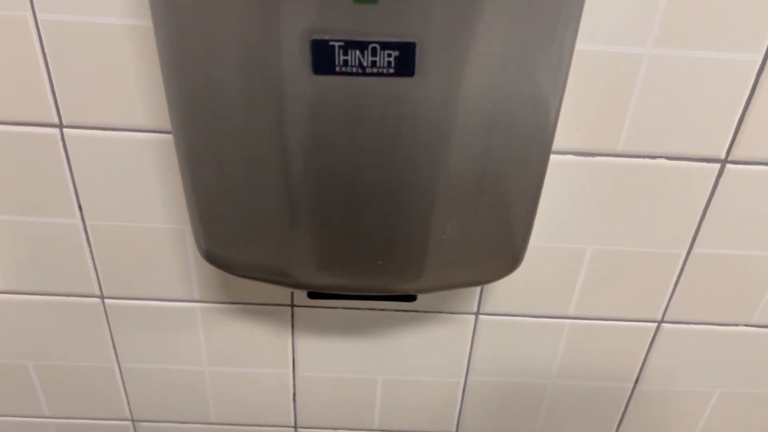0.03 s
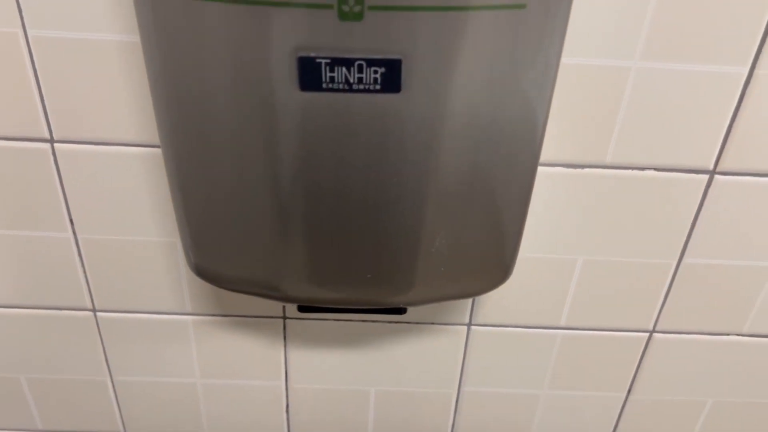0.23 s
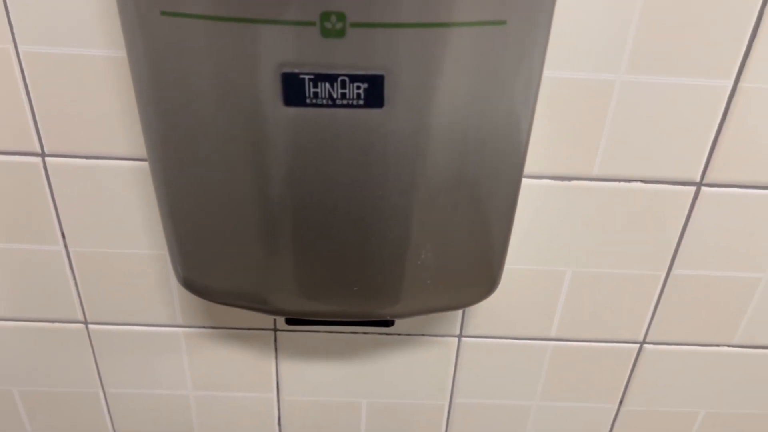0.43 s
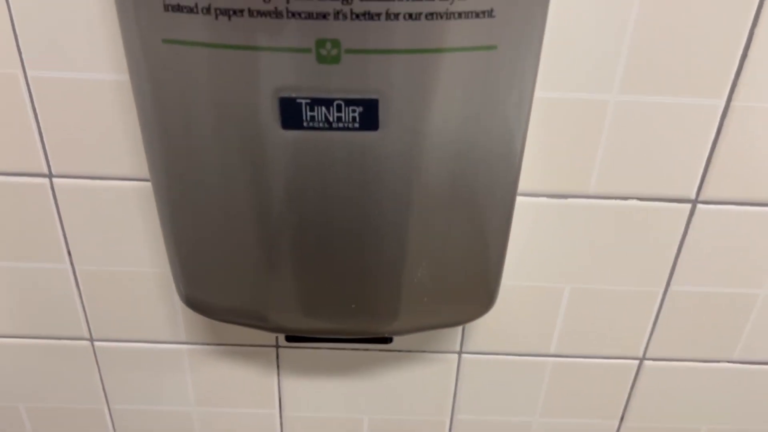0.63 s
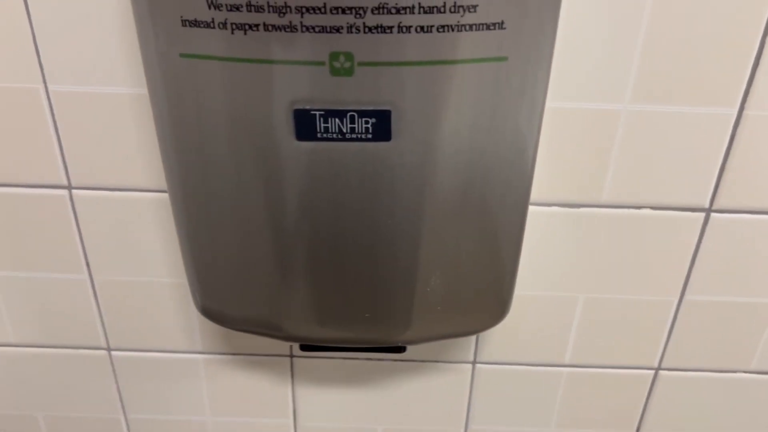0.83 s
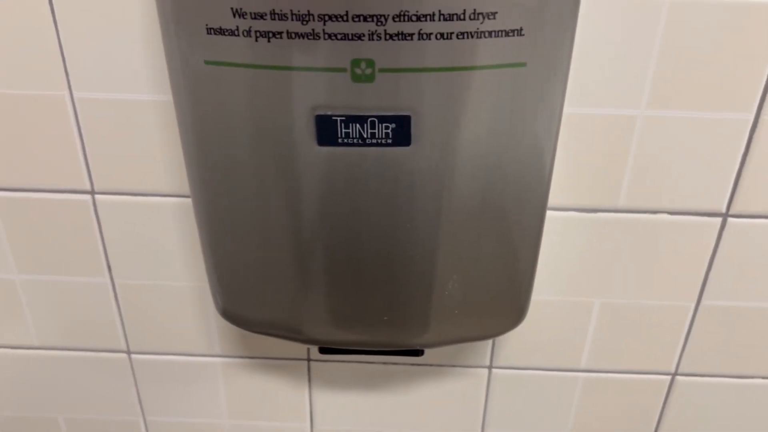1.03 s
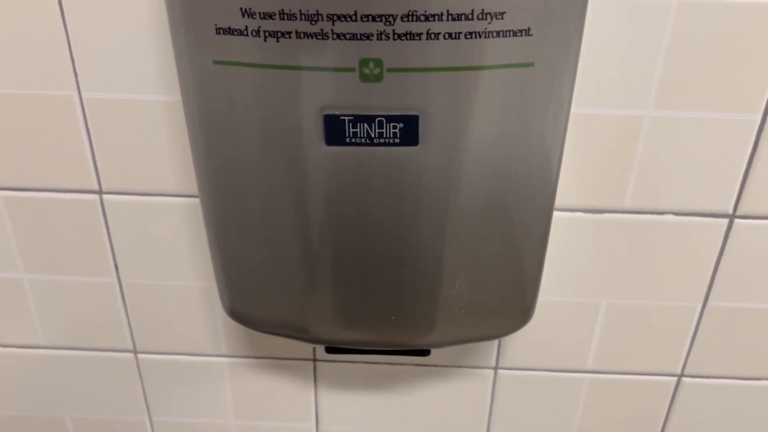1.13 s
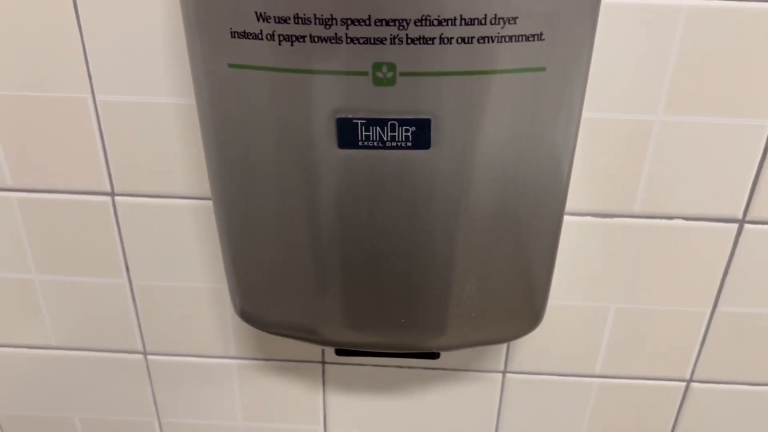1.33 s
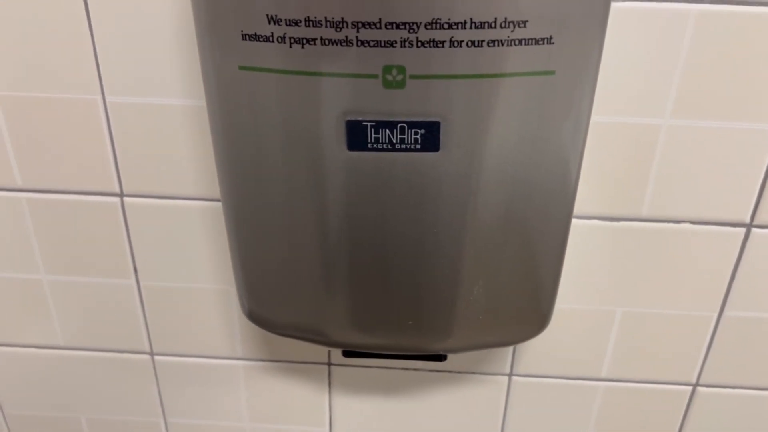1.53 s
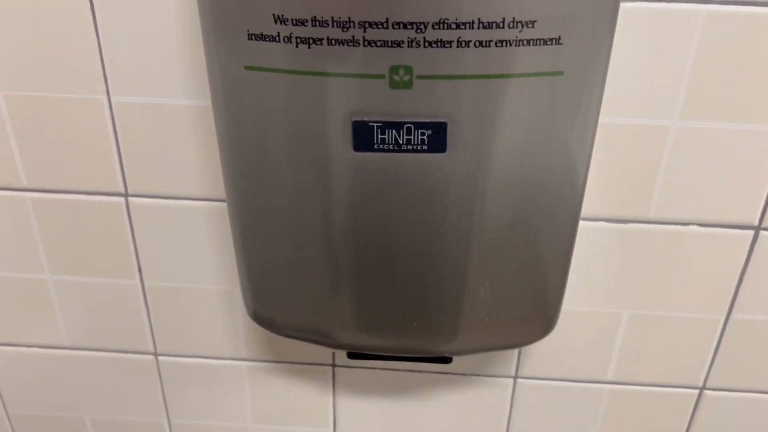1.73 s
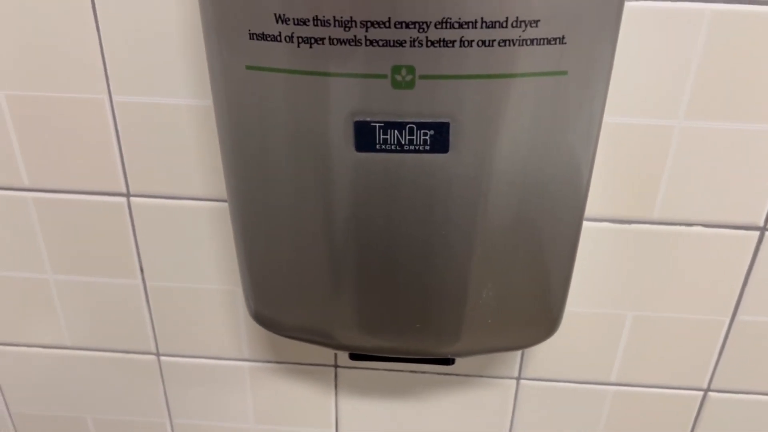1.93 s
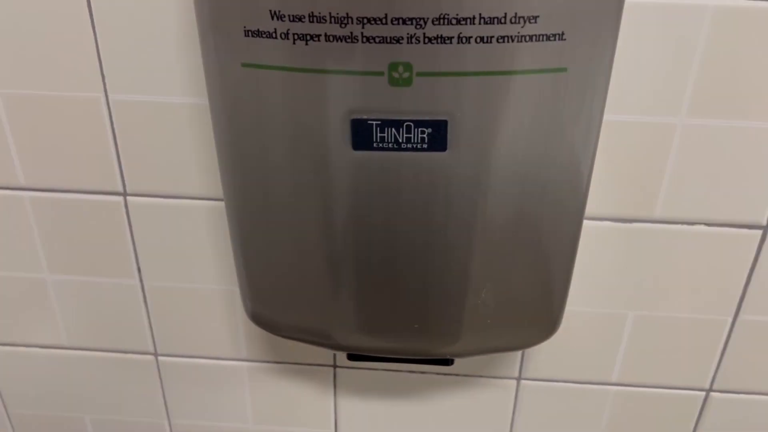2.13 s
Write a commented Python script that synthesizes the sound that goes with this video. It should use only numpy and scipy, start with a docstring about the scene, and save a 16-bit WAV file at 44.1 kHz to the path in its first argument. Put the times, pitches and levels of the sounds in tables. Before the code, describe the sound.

Hand dryer motor coasting to a stop, its hum dropping in pitch as the air dies.

```python
"""A tiled restroom, close to a wall-mounted hand dryer that is coasting to a stop.
The unbalanced shaft hums down in pitch, and its overtones sweep through the housing's resonances.
The fan's whistle and the rush of air die first, leaving the rumble of the bearings and the thin
hiss of the carbon brushes over quiet room tone and the boom of a low room resonance."""
import sys
import numpy as np
from scipy import signal
from scipy.fft import rfft, irfft
from scipy.io import wavfile
from scipy.ndimage import uniform_filter1d

SR = 44100
rng = np.random.default_rng(int(sys.argv[2]) if len(sys.argv) > 2 else 0)


def waveform_to_disk(signal):
    """Save audio, clipped to [-1, 1], as 16-bit WAV at the path in sys.argv[1]."""
    frames = np.transpose(np.atleast_2d(signal))
    scaled = np.clip(frames, -1, 1) * 32767
    samples = np.round(scaled).astype(np.int16)
    wavfile.write(sys.argv[1], SR, samples)


N = 96402
TIME = np.arange(N) / SR
FREQS = np.maximum(np.arange(N // 2 + 1) * SR / N, 1)
LEFT_RIGHT = np.array([[1], [-1]])

# Stereo balance of the room. Each row: frequency in Hz, left minus right in dB.
ROOM_LEAN = [(100, 0.9), (200, 0.5), (400, 2.3), (700, 1.8), (1300, 4), (2400, 6), (4400, 7.5), (6200, 10),
             (8100, 4.8), (10000, 0)]


def undb(db):
    """Amplitude ratio of a level in decibels."""
    return 10 ** (np.asarray(db) / 20)


def unit(x):
    """Normalisation to an rms of 1."""
    return x / np.sqrt(np.mean(x ** 2))


def curve(rows):
    """Linear interpolation in time."""
    return np.interp(TIME, *np.transpose(rows))


def shape(rows):
    """Interpolation on a log-frequency axis."""
    hz, values = np.transpose(rows)
    return np.interp(np.log(FREQS), np.log(hz), values)


def walk(rate):
    """Smooth random fluctuation of unit rms, with `rate` new values a second."""
    hold = max(int(SR / rate), 1)
    steps = np.repeat(rng.standard_normal(N // hold + 1), hold)
    return unit(uniform_filter1d(steps, hold)[:N])


def tone(hz, jitter, rate):
    """Random frequency modulation makes a sine tremble in pitch."""
    return np.sin(2 * np.pi * np.cumsum(hz * (1 + jitter * walk(rate))) / SR)


def resonances(modes):
    """Frequency response of steep-sided resonances that add in power."""
    power = 0
    for hz, width, db in modes:
        detuning = (FREQS ** 2 - hz ** 2) / (FREQS * width)
        power += undb(db) ** 2 / (1 + detuning ** 2) ** 1.47
    return np.sqrt(power)


def ring(x, modes):
    """Damped modes, driven by a passing tone, ring on in free decay."""
    response = 0
    for hz, t60, db in modes:
        decay = np.log(1000) / t60
        response += undb(db) * 2 * decay / SR * np.exp(-decay * TIME) * np.cos(2 * np.pi * hz * TIME)
    return signal.fftconvolve(x, response[None], axes=1)[:, :N]


def ripple(spacing_hz=22.09, depth_db=2.5):
    """Interference of hard-wall reflections leaves fine spectral peaks and dips, weak in the bass."""
    peaks = np.interp(FREQS, np.arange(2000) * spacing_hz, rng.standard_normal(2000))
    return undb(depth_db * np.minimum(FREQS / 1200, 1) * peaks)


def noise(gain, lean, direct_hz=3540, lag_s=0.0001606):
    """Partly coherent stereo noise: alike in the bass, diffuse in the middle, more direct on top."""
    # Each row: frequency in Hz, coherence of the two sides from 0 to 1.
    likeness = [(100, 0.82), (250, 0.78), (500, 0.57), (1200, 0.025), (3500, 0.013), (6500, 0.28),
                (9000, 0.3), (15000, 0.27)]
    coherence = shape(likeness)
    mid, side = rfft(rng.standard_normal((2, N)))
    pair = mid * np.sqrt(1 + coherence) + LEFT_RIGHT * side * np.sqrt(1 - coherence)
    pair[0] *= np.exp(-2j * np.pi * FREQS * (FREQS > direct_hz) * lag_s)  # treble reaches the left later
    balance = undb(LEFT_RIGHT * shape(lean) / 2)
    balance /= np.sqrt(np.mean(balance ** 2, axis=0))
    return unit(irfft(pair * gain * balance * ripple(), N))


def tiles(x, wet_db, lean_db, t60_s=0.86, build_s=0.033):
    """Reverberation: the tiles add a diffuse, exponentially decaying field to the direct sound."""
    x = x * np.minimum(TIME / .012, 1)
    tail = noise(1, ROOM_LEAN) * undb(-60 * TIME / t60_s)
    tail *= 1 - np.exp(-TIME / build_s)
    tail /= np.sqrt(np.sum(tail ** 2) / 2)
    wet = signal.fftconvolve(x[None], tail, axes=1)[:, :N]
    direct = x * undb(LEFT_RIGHT * lean_db / 2)
    return (direct + undb(wet_db) * wet) / np.hypot(1, undb(wet_db))


def restroom():
    """Quiet room tone, and a low room resonance that booms as the slowing shaft passes its pitch."""
    # Each row: frequency in Hz, relative level in dB.
    room_spectrum = [(25, -15), (70, -2), (150, -1.5), (300, -11), (500, -14.5), (800, -21.5), (1500, -27),
                     (5000, -61)]
    # Each row: time in seconds, level in dB.
    boom_level = [(0, -87), (.6, -70), (1.25, -71), (1.42, -66), (1.55, -76), (1.66, -78), (1.72, -64),
                  (1.89, -62), (1.96, -76), (2.19, -84)]
    room_tone = undb(-68) * noise(undb(shape(room_spectrum)), ROOM_LEAN)
    boom = tone(hz=71.6, jitter=0.009, rate=11) * undb(curve(boom_level))
    return room_tone + boom


def brushes(angle, throb_depth=0.059):
    """Sliding friction of carbon brushes on the commutator excites narrow high resonances."""
    # Each row: frequency in Hz, width in Hz, relative level in dB.
    brush_modes = [(2627, 30, -2), (3340, 92, 0), (3600, 270, -21), (3804, 53, -2), (5310, 61, -2),
                   (6420, 54, 1), (6647, 130, 3.5), (7020, 62, 4.5), (7290, 440, -5), (7780, 28, 2),
                   (8120, 71, 1), (11140, 300, -13.5), (15230, 1600, -21)]
    # Broad hiss under the resonances. Each row: frequency in Hz, relative level in dB.
    hiss_spectrum = [(1000, -37), (2500, 4.5), (2950, -12), (3500, 4.5), (5500, -11), (7500, 9.5),
                     (8300, 3), (8700, -5), (13000, -30.5), (15800, 1)]
    # Each row: frequency in Hz, left minus right in dB.
    brush_lean = [(2500, 7), (5500, 2.5), (7000, 3), (9000, -1)]
    # Each row: time in seconds, gain in dB.
    brush_level = [(0, -50.5), (.6, -64), (1.2, -65.5), (1.45, -66.5), (1.8, -64), (2.0, -68.5),
                   (2.19, -69.5)]
    ringing = noise(resonances(brush_modes), brush_lean)
    hiss = undb(0.5) * noise(undb(shape(hiss_spectrum)), brush_lean)
    return (ringing + hiss) * undb(curve(brush_level)) * (1 + throb_depth * np.cos(angle))


def bearings(angle, throb_depth=0.078):
    """Rolling noise, amplitude-modulated once a turn, excites the modes of housing and duct."""
    # Each row: frequency in Hz, width in Hz, relative level in dB.
    housing_modes = [(147.2, 16.4, -6), (187.5, 25, -8.5), (250, 29, -9), (349, 72, -11.5),
                     (439.4, 34.3, -5.5), (506, 21.7, 0), (576, 87, -11.5), (642.8, 18, -7.5),
                     (796.4, 8.3, -9.5)]
    duct_modes = [(910, 90, -11), (1100, 200, -8), (1340, 160, -.5), (1655, 110, 0), (1598, 42, 5),
                  (1930, 60, -9), (2170, 170, -3), (2490, 75, -1), (2610, 100, -3.5)]
    # Each row: time in seconds, level in dB.
    rumble_level = [(0, -47.5), (.5, -49.5), (1.0, -52), (1.4, -55), (1.75, -62), (1.95, -72), (2.19, -83)]
    duct_level = [(0, -43.5), (.5, -47.5), (.9, -52), (1.3, -60), (1.6, -69.5), (1.9, -81.5), (2.19, -106)]
    rumble = noise(resonances(housing_modes), ROOM_LEAN) * undb(curve(rumble_level))
    duct = noise(resonances(duct_modes), ROOM_LEAN) * undb(curve(duct_level))
    return (rumble + duct) * (1 + throb_depth * np.cos(angle))


def airflow():
    """Broadband flow noise: air rushes through the duct and hisses from the nozzle."""
    # Each row: frequency in Hz, relative spectral density in dB.
    rush_spectrum = [(25, -44), (60, -45), (140, -15.5), (280, -7.5), (400, -2.5), (500, -1), (620, -6.5),
                     (800, -7.5), (1100, -4.5), (1600, -2), (2000, -1.5), (2680, -1), (2950, -17.5),
                     (3400, -14), (4500, -14.5), (9000, -41)]
    jet_spectrum = [(100, -38), (700, -36), (1500, -18), (3000, 3), (3900, -3.5), (5000, 0), (6300, 2.5),
                    (8000, -8), (9000, -4), (10300, -16), (11300, -9), (12300, -20), (15800, -26)]
    # Each row: time in seconds, level in dB.
    rush_level = [(0, -37.5), (.17, -40.5), (.45, -44.5), (.75, -56), (1.1, -65), (1.5, -69), (1.9, -80.5),
                  (2.19, -82.5)]
    jet_level = [(0, -40), (.1, -44.5), (.2, -49), (.45, -56.5), (.75, -62.5), (1.2, -68.5), (2.19, -80.5)]
    rush = noise(undb(shape(rush_spectrum)), ROOM_LEAN) * undb(curve(rush_level))
    jet = noise(undb(shape(jet_spectrum)), ROOM_LEAN) * undb(curve(jet_level))
    return rush + jet


def fan(shaft_hz, blades=7, jitter=.009, roughness=.55, octave_fade_db_per_s=55):
    """A rough whistle at the blade-passing frequency and its octave, filtered by the fan's casing."""
    # Each row: time in seconds, level ahead of the casing in dB.
    whistle_level = [(0, -56), (.06, -43), (.1, -39), (.16, -40.5), (.21, -41), (.25, -45), (.3, -55),
                     (.6, -63), (1.2, -72), (2.19, -104)]
    # Each row: frequency in Hz, width in Hz, gain in dB.
    casing_modes = [(2690, 180, 0), (2865, 210, -6), (3210, 200, 0), (6270, 150, 6), (1450, 1500, 3.5)]
    phase = 2 * np.pi * blades * np.cumsum(shaft_hz * (1 + jitter * walk(200))) / SR
    octave = undb(-octave_fade_db_per_s * TIME) * np.sin(2 * phase)
    flutter = 1 + roughness * walk(260)
    whistle = (np.sin(phase) + octave) * flutter * undb(curve(whistle_level))
    whistle = tiles(whistle, wet_db=1, lean_db=12)
    return irfft(rfft(whistle) * resonances(casing_modes), N)


def shaft_overtones(shaft_hz, muffle_hz=590):
    """Forced vibration: the hum's falling overtones swell as they cross the housing's resonances."""
    # Each row: multiple of the shaft speed, relative level in dB.
    overtones = [(1.95, -7.5), (2.9, -1.5), (3.87, 2), (4.82, -5), (5.8, -16), (6.4, -6), (7.2, -12.5)]
    # Each row: time in seconds, gain in dB.
    drive_level = [(0, -63), (.5, -57), (.8, -48), (1.02, -49), (1.17, -61), (1.31, -53.5), (1.52, -52.5),
                   (1.7, -53.5), (1.85, -62.5), (2.19, -89)]
    # Each row: frequency in Hz, 60 dB decay time in seconds, gain in dB.
    panel_modes = [(142.25, 0.23, 4), (344.3, 0.088, -5.5), (486, 0.097, 2), (582.2, 0.16, -7),
                   (645, 0.29, -8.5)]
    partials = sum(undb(db + walk(20)) * tone(multiple * shaft_hz, jitter=.005, rate=90)
                   for multiple, db in overtones)
    muffled = signal.sosfilt(signal.butter(6, muffle_hz, fs=SR, output="sos"), partials)
    drive = tiles(muffled * undb(curve(drive_level)), wet_db=-7.5, lean_db=4.5)
    return ring(drive, panel_modes)


def shaft(angle):
    """Rotor unbalance hums at the rotation frequency and excites the room's standing waves in passing."""
    # The hum swells and dips as its pitch slides. Each row: time in seconds, level in dB.
    hum_level = [(0, -46), (.09, -44), (.14, -45), (.165, -55), (.21, -57), (.255, -47), (.29, -58),
                 (.35, -54), (.38, -47), (.43, -58), (.46, -55), (.485, -41.5), (.52, -46), (.55, -56),
                 (.59, -44), (.635, -40), (.67, -55), (.705, -52), (.727, -41), (.765, -62), (.825, -48),
                 (.855, -62), (.93, -49), (.96, -54), (1.04, -53), (1.08, -64), (1.11, -49.5), (1.16, -57),
                 (1.25, -51.5), (1.3, -64), (1.35, -59), (1.49, -69), (1.6, -76), (2.19, -100)]
    # Each row: time in seconds, left minus right in dB.
    hum_lean = [(0, 7), (.1, 6), (.17, -7), (.45, 5), (.6, -5.5), (.72, -5.5), (.85, 3), (1.5, -4.5)]
    # Each row: frequency in Hz, 60 dB decay time in seconds, gain in dB.
    room_modes = [(434, 1.2, 1), (335, .8, -7), (286, .7, -7), (252, 1.3, -5)]
    hum = tiles(np.sqrt(2) * np.sin(angle), wet_db=-8.5, lean_db=curve(hum_lean))
    hum *= undb(curve(hum_level))
    return hum + ring(hum, room_modes)


def scene():
    """Superposition of room and dryer; one falling shaft speed sets the dryer's tones and throb."""
    # Each row: time in seconds, speed in turns per second.
    shaft_speed = [(0, 488), (.1, 431), (.15, 418), (.25, 368), (.49, 286), (.7, 233), (.94, 183.6),
                   (1.22, 138), (1.45, 100), (1.85, 48), (2.19, 9.8)]
    shaft_hz = curve(shaft_speed)
    angle = 2 * np.pi * np.cumsum(shaft_hz) / SR
    noises = restroom() + brushes(angle) + bearings(angle) + airflow()
    return noises + fan(shaft_hz) + shaft_overtones(shaft_hz) + shaft(angle)


def record(dry):
    """Band limiting: a steep elliptic low-pass cuts the treble above 15.8 kHz."""
    return signal.sosfilt(signal.ellip(10, .2, 70, 15800, fs=SR, output="sos"), dry)


dry = scene()
out = record(dry)
waveform_to_disk(out)
```